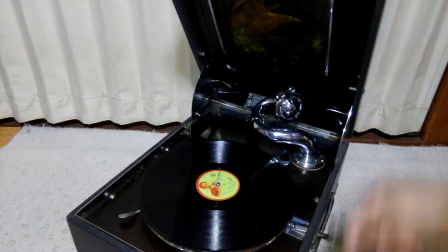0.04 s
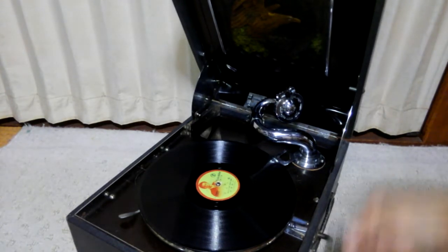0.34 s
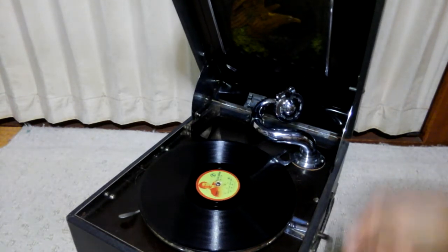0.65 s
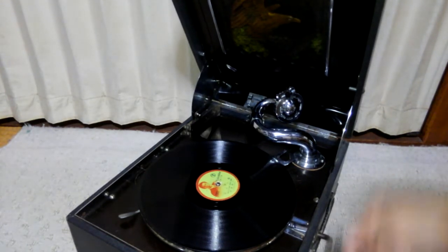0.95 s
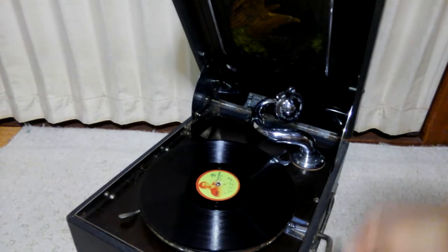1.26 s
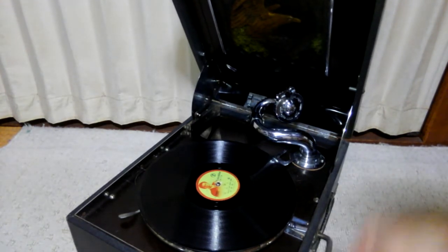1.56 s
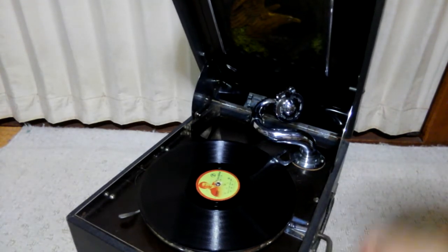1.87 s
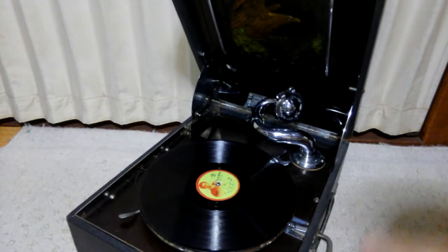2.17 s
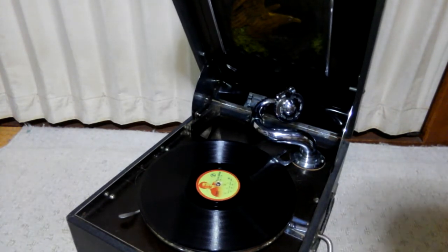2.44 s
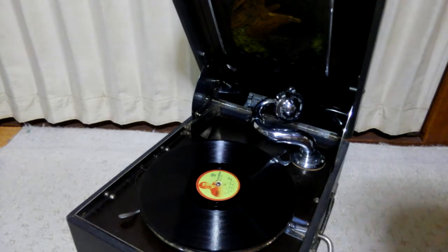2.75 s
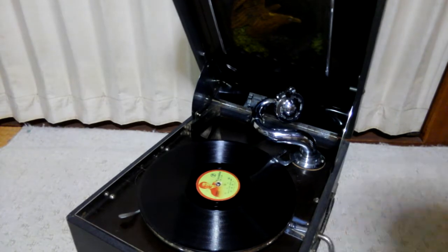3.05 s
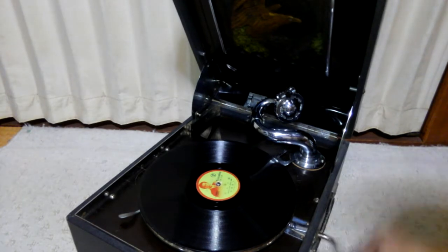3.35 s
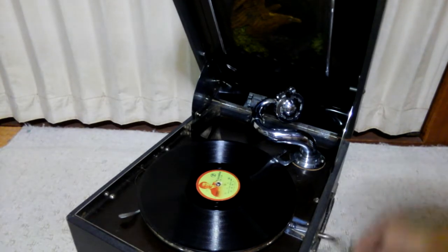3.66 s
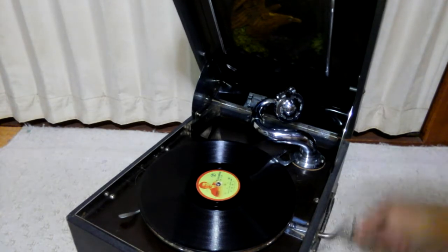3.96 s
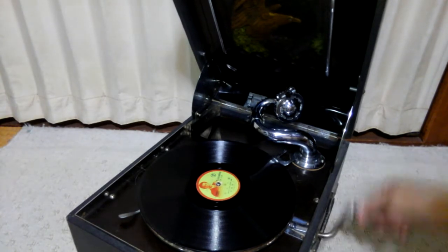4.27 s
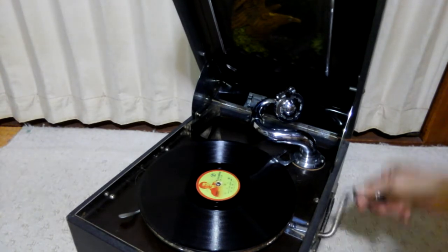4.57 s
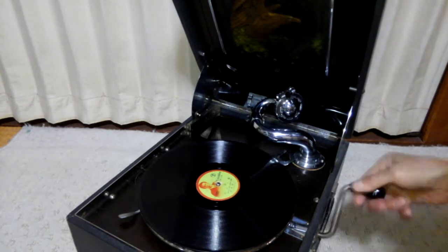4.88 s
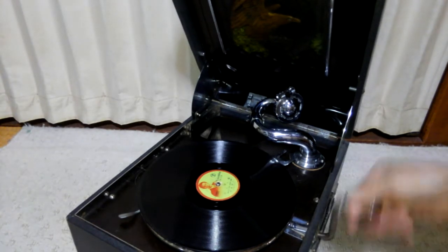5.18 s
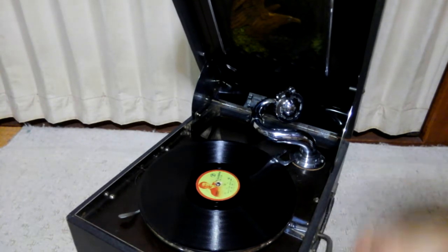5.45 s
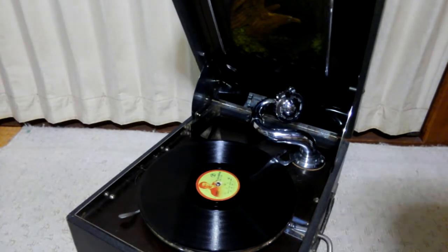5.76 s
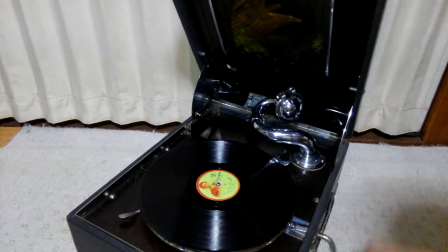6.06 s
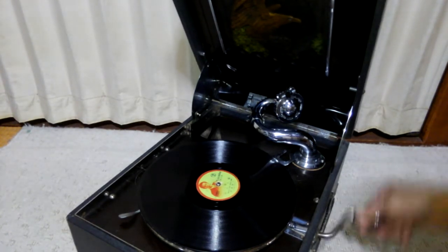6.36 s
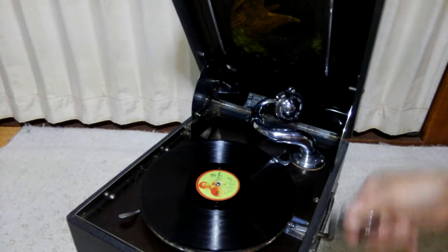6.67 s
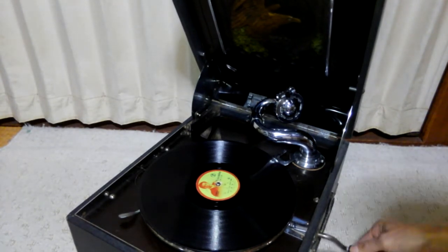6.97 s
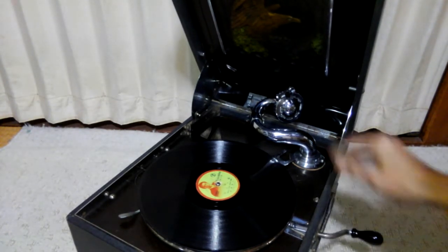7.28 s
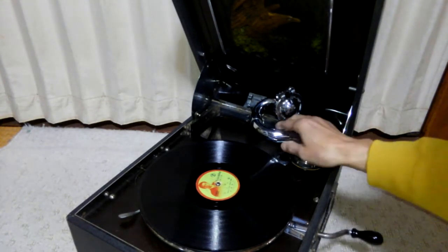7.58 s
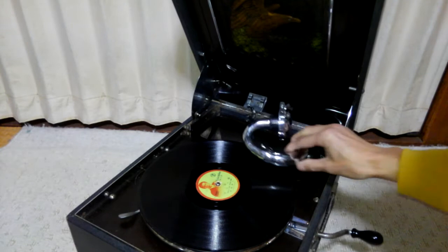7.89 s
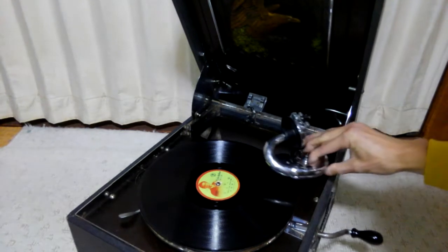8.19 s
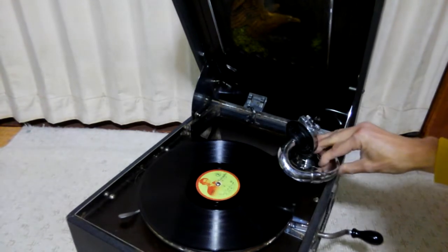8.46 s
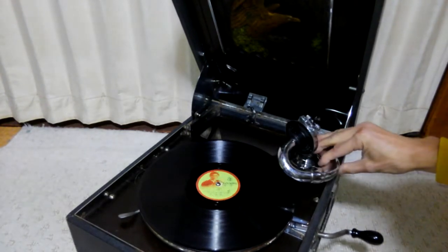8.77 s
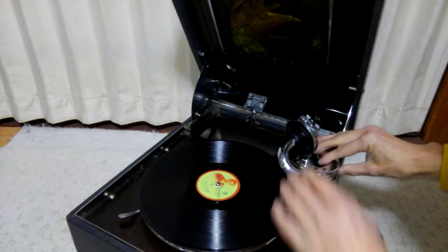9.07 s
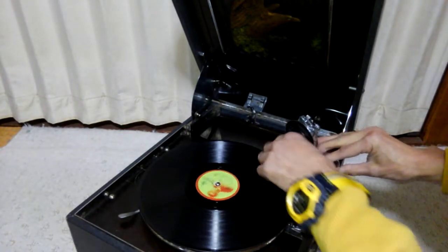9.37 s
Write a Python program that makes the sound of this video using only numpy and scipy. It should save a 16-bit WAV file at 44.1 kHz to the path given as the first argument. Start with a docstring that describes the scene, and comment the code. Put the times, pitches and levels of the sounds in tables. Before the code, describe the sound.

A wind-up gramophone is cranked with regular ratchet clicks, small squeaks and rumbling gears, then its metal tone arm clatters briefly.

```python
"""Rumbling gears and the snap of a ratchet, close to the microphone: a portable wind-up gramophone
is being cranked in a small curtained room. The pawl squeaks up each tooth and drops off it, about
three times a second, until the hand slows. Then the metal tone arm is unfolded with a clatter
and the turntable brake is let off. The lid and the nearby walls answer briefly."""
import sys
import numpy as np
from scipy import signal
from scipy.fft import rfft, irfft, next_fast_len
from scipy.io import wavfile
from scipy.ndimage import uniform_filter1d, map_coordinates

SR = 44100
rng = np.random.default_rng(int(sys.argv[2]) if len(sys.argv) > 2 else 0)


def dump(signal):
    """Clip the signal to [-1, 1] and save it as 16-bit WAV at the path in sys.argv[1]."""
    limited = np.clip(np.atleast_2d(signal).T, -1, 1)
    pcm = np.round(limited * 32767).astype(np.int16)
    wavfile.write(sys.argv[1], SR, pcm)


N = 424677
AGE = np.arange(SR // 3) / SR  # time since a contact, s

# Levels in the tables are relative; each source sets its own gain.
# rumble of the winding gears: f/Hz, level/dB
RUMBLE_SPECTRUM = [(24, -33), (40, 4.5), (139, -5), (214, -2.5), (273, -2.5), (459, -7.5), (536, -13.5),
                   (660, -4), (784, -15.5), (932, -2.5), (1050, -15), (1270, -35), (1390, -15), (1710, -42),
                   (2500, -30), (3250, -49), (5500, -120)]
# metal sliding on metal: f/Hz, level/dB
SLIDE_SPECTRUM = [(1800, -5.5), (2300, -10.5), (2800, -2.5), (3500, -9), (4600, -6), (5700, -2),
                  (6600, 6.5), (7500, -2.5), (8700, -11), (11000, -30)]
# low resonances of the case, droning under the gears: f/Hz, level/dB
CASE_HUM = [(76, -71.5), (138, -73), (198, -71.5)]
# fingers slipping round the handle on the last turn: t/s, gain
FINGER_SLIP = [(6.76, 0.18), (6.84, 1), (6.92, 0.63), (6.98, 0.055)]
# skin rubbing on the handle: f/Hz, level/dB
FINGER_SPECTRUM = [(2500, -28), (4000, -2), (4800, 3), (6500, 9), (8500, -8), (13000, -12)]

# one row per ratchet tooth: t/s, snap level/dB, knock level/dB, squeak level/dB, squeak f/Hz
TEETH = [(.034, -28.5, -46, -32.5, 761), (0.346, -35, -57, -35, 820), (.655, -30.5, -45, -35.5, 767),
         (0.9624, -26, -39.5, -33.5, 865), (1.274, -24.5, -41.5, -41.5, 767),
         (1.589, -21.5, -39, -29.5, 811), (1.897, -23.5, -48, -51.5, 747), (2.2126, -27, -49.5, -32.5, 764),
         (2.5155, -31, -55, -50, 819), (2.8261, -24.5, -39, -36.5, 772), (3.1537, -28, -50, -51, 814),
         (3.4931, -24.5, -41, -33.5, 752), (3.8116, -30.5, -54.5, -33.5, 736), (4.14, -37, -48.5, -30, 837),
         (4.4706, -24, -43, -35, 755), (4.798, -28, -54, -37, 753), (5.1393, -27.5, -53.5, -78, 734),
         (5.4701, -44.5, -55, -52.5, 673), (5.8133, -34.5, -50, -54, 900), (6.196, -54, -54, -58, 900),
         (6.562, -61, -64, -58, 750)]
LAST_TOOTH_S, REST_S = 7.132, 7.45  # the crank reaches its last tooth, then comes to rest
TOOTH_EDGES = np.append([row[0] for row in TEETH], LAST_TOOTH_S)  # bounds of the teeth: t/s
BRISK_TEETH_PER_S = 3.52  # the pace that counts as full speed
# the steel pawl on the ratchet wheel, damped by the contact: f/Hz, level/dB, t60/s
PAWL_MODES = [(2760, -6, .022), (3050, -14, .015), (3350, -12, .015), (3580, -8, .02), (4250, -14, .02),
              (4450, -15, .015), (4900, -14, .012), (5400, -5, .012), (5700, -4, .012), (5920, 0, .018),
              (6200, -4, .015), (6880, 0, .018), (7950, -6, .014), (10750, -23, .02)]
# the wheel's faint after-ring: f/Hz, level/dB, t60/s
WHEEL_MODES = [(3581, -8, .15), (3947, -11, .18), (4230, -10, .15), (5649, -3, .13), (6165, -4, .13),
               (6470, -6, .18), (6618, 0, .17), (6835, -3, .13), (6977, -2, .14), (7200, -3, .14)]
# the case rattling as the pawl drops: f/Hz, level/dB
SNAP_SPECTRUM = [(600, -13.5), (1000, -12), (1700, -16.5), (2100, -11.5), (2800, -11), (3500, -4.5),
                 (4400, -6), (5000, -5.5), (5700, -35), (6600, 5), (7200, -3), (8300, -5.5), (9500, -21),
                 (10700, -20.5), (12000, -25.5), (15800, -32)]
# the wooden motor board: f/Hz, level/dB, t60/s
BOARD_MODES = [(653.7, -9.5, 0.091), (748, -12, 0.21), (805, -4, 0.032), (892.5, -9, 0.075),
               (971, -17, 0.067), (236, -17.5, 0.036), (116, -14.5, 0.055)]

# slack taken up on every tooth: share of the tooth's time, knock level/dB, tick level/dB, tick f/Hz
SLACK_POINTS = [(.35, -65, -69, 2830), (.77, -55.5, -60, 2740), (.89, -52.5, -53.5, 6240)]
# the loudest knocks of crank and gears: t/s, knock level/dB, tick level/dB
LOUD_KNOCKS = [(2.14, -52, -46.5), (2.44, -48, -51), (2.706, -43.5, -66), (2.937, -50, -51),
               (4.065, -48, -46), (5.393, -54, -56), (6.04, -46, -75), (6.437, -48, -75), (6.616, -51, -64),
               (6.66, -49.5, -61), (6.802, -56.5, -68), (7.131, -58, -72)]
# a soft knock in the gears: f/Hz, level/dB
KNOCK_SPECTRUM = [(150, -4), (450, 5.5), (900, 7.5), (1500, -4), (2800, -14.5), (4200, -20), (6500, -13),
                  (10000, -30), (15000, -53)]
# the narrow band of a gear tick: multiple of its pitch, level/dB
TICK_BAND = [(.5, -26), (.88, -12), (1, 0), (1.12, -12), (2, -26)]
# the pawl rasping on a rough tooth face: f/Hz, level/dB
RASP_SPECTRUM = [(300, -24), (600, -4.5), (750, 8.5), (1100, 1.5), (1300, -3), (1650, -9), (2000, -11),
                 (2700, -5.5), (4000, -37)]

# joints of the tone arm, then the brake lever:
# t/s, click level/dB, clack level/dB, rattle length/s, ring f/Hz, ring level/dB
JOINTS = [(7.781, -27, -43, .004, 1255, -40), (7.9438, -34.5, -52.5, .004, 3283, -30.5),
          (7.97, -47, -64, .004, 313, -52.5), (8.132, -55, -54, .004, 994, -58),
          (8.1641, -37.5, -36, .024, 1480, -44), (8.2367, -42, -56.5, .053, 3390, -37),
          (8.8747, -46, -51, .004, 1316, -48)]
# a joint's bright click: f/Hz, level/dB
CLICK_SPECTRUM = [(1000, -11), (2600, -46), (3400, -9), (4700, -9), (5700, 1), (6600, 6.5), (8000, -2.5),
                  (9000, -12.5), (11000, -20), (12000, -24), (15500, -31)]
# the arm's chromed tube: f/Hz, level/dB, t60/s
TUBE_MODES = [(3330, -9, .04), (4700, -13, .05), (5620, -3, .035), (6240, -4, .05), (6570, 0, .035),
              (7880, -3, .03), (9700, -14, .03)]
# the tube's hollow clack: f/Hz, level/dB
CLACK_SPECTRUM = [(60, -7), (150, -12.5), (400, 0.5), (700, 1), (1000, 6.5), (1250, -0.5), (1550, 3.5),
                  (1900, -2.5), (2400, 1.5), (3300, -4), (4500, -7), (8000, -32)]
# the wooden case under the arm: f/Hz, level/dB, t60/s
CASE_MODES = [(137, -12, 0.11), (363, -1, 0.098), (437, -7, 0.1), (644, 2, .09), (900, -1, 0.078)]
# the pivot rubbing as the arm swings: t/s, level/dB
PIVOT_SWING = [(7.95, -69.5), (8.03, -60.5), (8.1, -59.5), (8.16, -64), (8.29, -63), (8.36, -68),
               (8.45, -80)]
# friction in that pivot: f/Hz, level/dB
PIVOT_SPECTRUM = [(100, -18), (350, 2), (700, -5.5), (1000, -2), (1400, -12.5), (2200, -10.5),
                  (4000, -20), (9000, -18.5)]

# first echoes from the nearby walls: delay/s, level/dB
WALL_ECHOES = [(0.0142, -16.5), (0.0231, -20)]
# decay of the curtained room: f/Hz, t60/s
ROOM_DECAY = [(150, 0.26), (800, 0.22), (3000, 0.18), (7000, 0.18), (14000, 0.14)]
# steady background at the microphone: f/Hz, level/dB
BACKGROUND_SPECTRUM = [(20, 2.5), (60, -5), (120, -12), (250, -19), (500, -22.5), (1000, -25),
                       (2500, -28.5), (5200, -29), (6800, -22.5), (8300, -29.5), (11500, -31.5),
                       (13600, -26), (15000, -30.5), (15900, -31)]


def amp(db):
    """Decibels to gain."""
    return 10 ** (np.asarray(db) / 20)


def unit(x):
    """Scaled to rms 1."""
    return x / np.sqrt(np.mean(x ** 2) + 1e-20)


def crest(x):
    """Scaled so that the loudest three milliseconds have rms 1."""
    return x / np.sqrt(uniform_filter1d(x ** 2, 128, mode="constant").max() + 1e-20)


def along(points, hz):
    """(f/Hz, value) points interpolated on a log axis."""
    freqs, values = np.transpose(points)
    return np.interp(np.log(hz + 1), np.log(freqs + 1), values)


def curve(points):
    """(t/s, value) points interpolated at every sample."""
    return np.interp(np.arange(N) / SR, *np.transpose(points))


def wobble(rate, size=N):
    """A smooth random curve, rate knots a second."""
    knots = rng.standard_normal(int(size * rate / SR) + 4)
    return map_coordinates(knots, [np.arange(size) * rate / SR])


def colour(x, spectrum):
    """Minimum-phase filter with the gain of (f/Hz, level/dB) points."""
    size = 2 * next_fast_len(len(x) // 2 + 2048)
    gain = amp(along(spectrum, np.fft.rfftfreq(size, 1 / SR)))
    cepstrum = irfft(np.log(gain), size)
    cepstrum[1:size // 2] *= 2
    cepstrum[size // 2 + 1:] = 0
    return irfft(rfft(x, size) * np.exp(rfft(cepstrum)), size)[:len(x)]


def hiss(spectrum, size=N):
    """Coloured noise of rms 1."""
    return unit(colour(rng.standard_normal(size), spectrum))


def fade(t60):
    """Free decay after a contact."""
    return 1000 ** (-AGE / t60)


def rise(seconds, power=1):
    """Onset from 0 to 1; a higher power starts more gently."""
    return 1 - np.exp(-(AGE / seconds) ** power)


def add(track, s, sound):
    """Mix a sound into the track at s seconds."""
    start = max(round(s * SR), 0)
    track[start:start + len(sound)] += sound[:N - start]


def ring(modes, contact_s):
    """Modes are driven for the contact time and then die away."""
    free = np.maximum(AGE - contact_s, 0)
    return crest(sum(amp(db) * 1000 ** (-free / t60) * np.sin(2 * np.pi * (hz * AGE + rng.random()))
                     for hz, db, t60 in modes))


def chatter(spectrum, contact_s, tail_db, t60):
    """Hard parts buzz together for the contact time, then the case dies away."""
    envelope = 1 / (1 + (AGE / contact_s) ** 4) + amp(tail_db) * fade(t60)
    return crest(colour(envelope * rng.standard_normal(len(AGE)), spectrum))


def crank():
    """The hand's motion per sample: teeth passed so far, and speed as a share of the brisk pace."""
    t = np.arange(N) / SR
    middles = (TOOTH_EDGES[:-1] + TOOTH_EDGES[1:]) / 2
    rate = np.interp(t, np.append(middles, REST_S), np.append(1 / np.diff(TOOTH_EDGES), 0))
    teeth = np.interp(t, TOOTH_EDGES, np.arange(len(TOOTH_EDGES)))
    return teeth, rate / BRISK_TEETH_PER_S


def gears(rumble_db=-59, slide_db=-65):
    """The winding train rumbles, slides and hums louder with speed; its load swells twice a tooth."""
    teeth, speed = crank()
    load_db = np.cos(4 * np.pi * (teeth - .46))
    drive = speed ** 1.7 * amp(load_db)
    effort_db = .9 * wobble(14)
    grind_db = 2.6 * wobble(45)
    out = drive * amp(rumble_db + effort_db + grind_db) * hiss(RUMBLE_SPECTRUM)
    out += speed ** 1.2 * amp(slide_db + effort_db + 2.15 * wobble(100)) * hiss(SLIDE_SPECTRUM)
    for hz, db in CASE_HUM:
        drone = np.sin(2 * np.pi * hz * np.arange(N) / SR)
        out += amp(db) * unit(drive * wobble(20) * drone)
    return out


def fingers(level_db=-65):
    """A faint hiss that swells as the fingers slip round the handle on the last turn."""
    return amp(level_db) * curve(FINGER_SLIP) * hiss(FINGER_SPECTRUM)


def pawl_drop(contact_s=.0043):
    """One fall of the pawl: a hard steel snap, the wheel's ring and the rattle of the case."""
    steel = amp(-2) * ring(PAWL_MODES, contact_s)
    wheel = amp(-18) * ring(WHEEL_MODES, contact_s)
    case = amp(-6) * chatter(SNAP_SPECTRUM, contact_s, tail_db=.5, t60=.12)
    return rise(.0006, power=2) * (steel + wheel + case)


def ratchet(variety_db=-4, board_db=1):
    """The teeth are alike, so the pawl's drops sound nearly the same; each knocks the motor board."""
    out = np.zeros(N)
    usual_drop = pawl_drop()
    for s, snap_db, knock_db, _, _ in TEETH:
        snap = crest(usual_drop + amp(variety_db) * pawl_drop())
        board = crest(ring(BOARD_MODES, contact_s=.0019) * rise(.003, power=2))
        add(out, s, amp(snap_db) * snap + amp(knock_db + board_db) * board)
    return out


def backlash(gain_db=-3, uneven_db=2, db_per_halving=14, loud_tick_hz=2800):
    """The gears take up their slack with soft knocks and small ticks, weaker as the crank slows."""
    out = np.zeros(N)
    blows = [(s, knock_db, tick_db, loud_tick_hz) for s, knock_db, tick_db in LOUD_KNOCKS]
    for start, period in zip(TOOTH_EDGES, np.diff(TOOTH_EDGES)):
        slowing_db = db_per_halving * np.log2(period * BRISK_TEETH_PER_S)
        for share, knock_db, tick_db, hz in SLACK_POINTS:
            force_db = uneven_db * rng.standard_normal() - slowing_db
            blows.append((start + share * period, knock_db + force_db, tick_db + force_db, hz))
    for s, knock_db, tick_db, hz in blows:
        tick_spectrum = [(hz * ratio, db) for ratio, db in TICK_BAND]
        add(out, s, amp(knock_db) * chatter(KNOCK_SPECTRUM, contact_s=.008, tail_db=4, t60=.18))
        add(out, s, amp(tick_db) * chatter(tick_spectrum, contact_s=.0019, tail_db=-16, t60=.052))
    return amp(gain_db) * out


def squeaks(tooth_share=.636, lead_s=.014, sag=.1, clean_db=-34):
    """The pawl sticks and slips up each tooth: an unsteady creak that swells, lingers and sags."""
    out = np.zeros(N)
    t = AGE - lead_s  # zero at the top of the swell
    for (s, _, _, db, hz), period in zip(TEETH, np.diff(TOOTH_EDGES)):
        # higher squeaks and faster teeth make shorter creaks
        length = .011 * (760 / hz) ** 3.4 * period * BRISK_TEETH_PER_S
        catch = amp(3.2 * wobble(220, len(t)))
        jitter = .048 * wobble(300, len(t))
        swell = np.exp(-(3 * t / length) ** 2 / 2)
        linger = amp(-9) * catch * np.exp(-(t / length - 1.46) ** 2)
        grip = swell + linger
        pitch = hz * (1 + jitter + sag * (np.exp(-np.abs(t) / length) - .5))
        phase = 2 * np.pi * np.cumsum(pitch) / SR
        harmonics = np.sin(phase) + amp(-20) * np.sin(2 * phase) + amp(-32) * np.sin(3 * phase)
        tone = amp(-1.5) * crest(grip * harmonics)
        # the rough tooth face rasps, more so in weak squeaks, and hisses once at every slip
        rasp = amp(-15 + .41 * (clean_db - db)) * crest(grip * hiss(RASP_SPECTRUM, len(t)))
        scrape = amp(-15) * crest(grip * hiss(SLIDE_SPECTRUM, len(t)) * (1 + np.sin(phase)))
        add(out, s + tooth_share * period - lead_s, amp(db) * (tone + rasp + scrape))
    return out


def arm_and_brake(bounce_s=.0094, uneven_db=.8, ring_cycles=130):
    """Joints click and rattle, the hollow tube clacks and rings on, and the case thuds below."""
    out = np.zeros(N)
    onset = rise(.0034)
    for start, click_db, clack_db, rattle_s, ring_hz, ring_db in JOINTS:
        contacts = np.arange(start, start + rattle_s, bounce_s)
        for s in contacts:
            force = amp(uneven_db * rng.standard_normal())
            click = amp(click_db - 3) * chatter(CLICK_SPECTRUM, contact_s=.0055, tail_db=-22.5, t60=.32)
            tube = amp(click_db - 4) * ring(TUBE_MODES, contact_s=.00064) * rise(.0013)
            clack = amp(clack_db) * chatter(CLACK_SPECTRUM, contact_s=.0098, tail_db=3.5, t60=.14)
            add(out, s, force * (click + tube + clack))
        thud = amp(click_db - 18) * ring(CASE_MODES, contact_s=.004)
        add(out, start, onset * thud)
        # the joint rings freely after its last contact
        after_ring = fade(ring_cycles / ring_hz) * np.sin(2 * np.pi * ring_hz * AGE)
        add(out, contacts[-1], amp(ring_db - 1) * onset * after_ring)
    return out


def pivot_rub(gain_db=-2):
    """The tone arm's pivot rubs as it swings out."""
    return amp(curve(PIVOT_SWING) + gain_db) * hiss(PIVOT_SPECTRUM)


def wall_echoes(x):
    """Nearby hard walls send clear, late copies to the microphone."""
    return sum(amp(db) * np.pad(x, (round(s * SR), 0))[:N] for s, db in WALL_ECHOES)


def room(x, delay_s=.007):
    """The lid and the curtained walls add a short diffuse tail whose treble dies first."""
    hz, t, noise = signal.stft(rng.standard_normal(SR // 2), SR, nperseg=256)
    decay = 1000 ** (-t / along(ROOM_DECAY, hz)[:, None])
    _, tail = signal.istft(noise * decay, SR, nperseg=256)
    tail = np.pad(tail / np.linalg.norm(tail), (round(delay_s * SR), 0))
    return signal.fftconvolve(x, tail)[:N]


def scene(room_db=-12.5, background_db=-62):
    """One microphone near the gramophone: mostly direct sound, a little room, a quiet background."""
    winding = ratchet() + squeaks() + gears() + fingers() + backlash()
    direct = winding + pivot_rub() + arm_and_brake()
    reflected = wall_echoes(direct) + amp(room_db) * room(direct)
    background = amp(background_db) * hiss(BACKGROUND_SPECTRUM)
    return (direct + reflected + background)[None]


def record(dry, top_hz=15950):
    """The camera behind the microphone keeps nothing above its band limit."""
    size = next_fast_len(N + SR // 2)
    passband = np.fft.rfftfreq(size, 1 / SR) < top_hz
    return irfft(rfft(dry, size) * passband, size)[..., :N]


dry = scene()
out = record(dry)
dump(out)
```